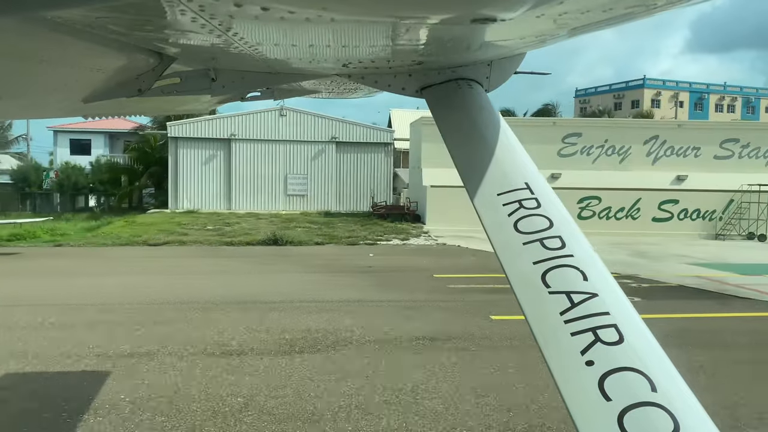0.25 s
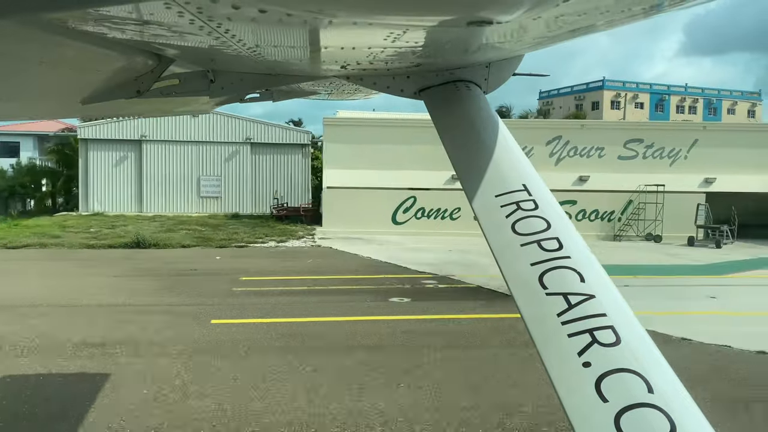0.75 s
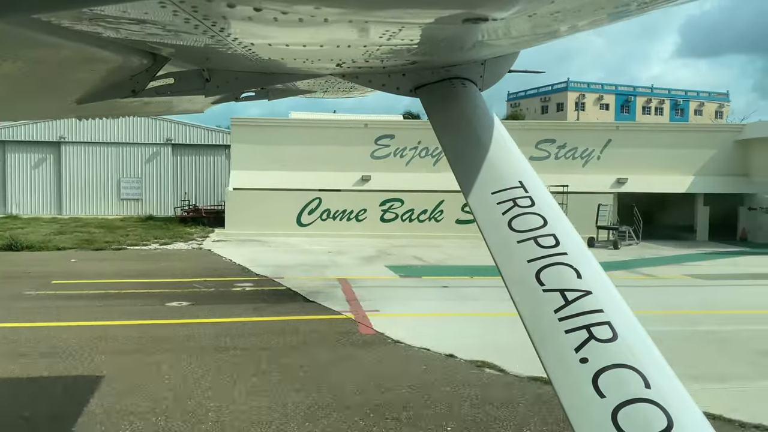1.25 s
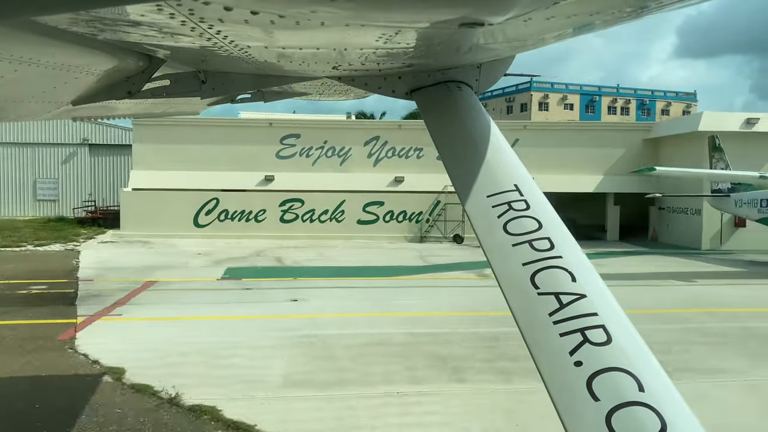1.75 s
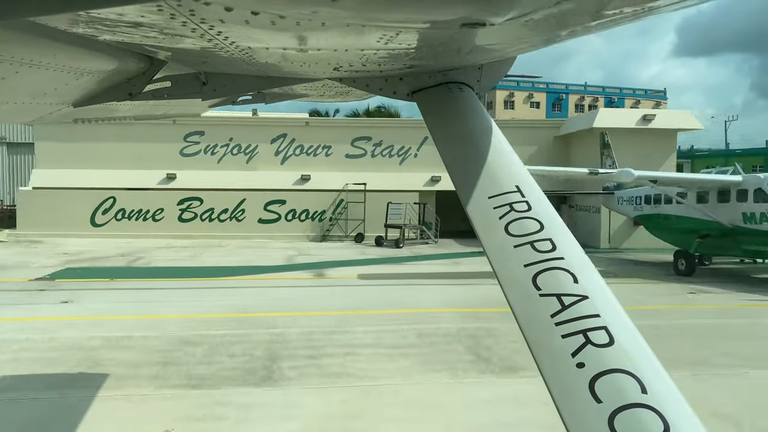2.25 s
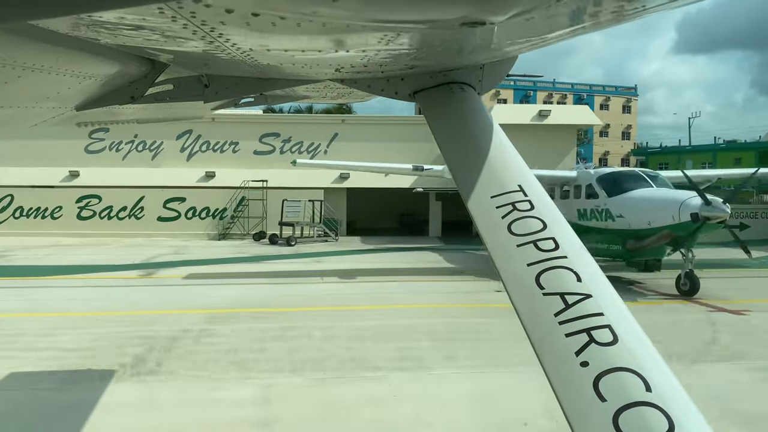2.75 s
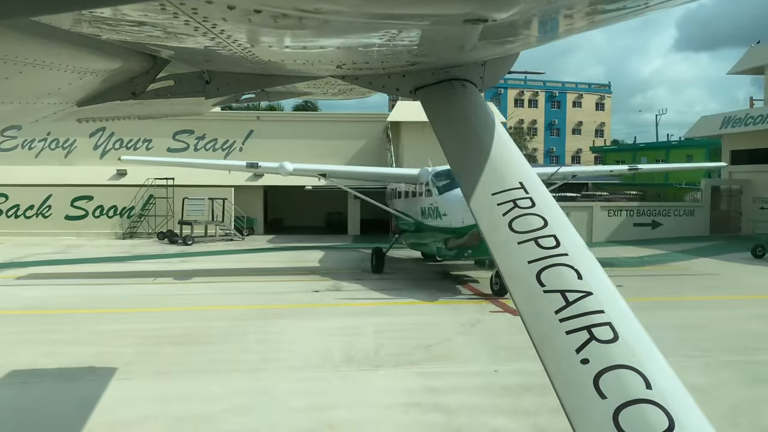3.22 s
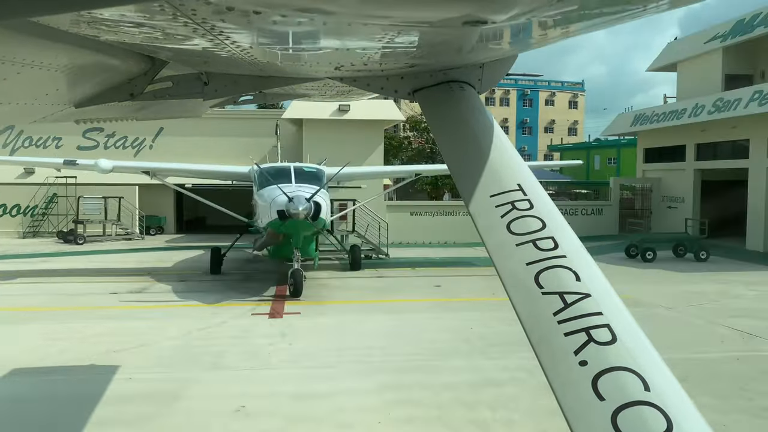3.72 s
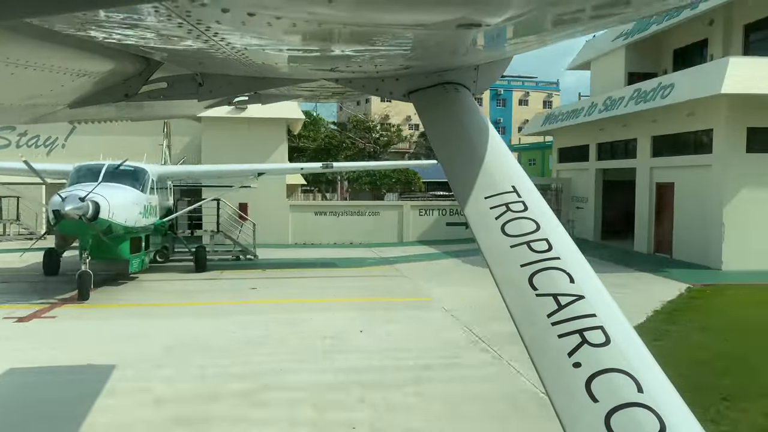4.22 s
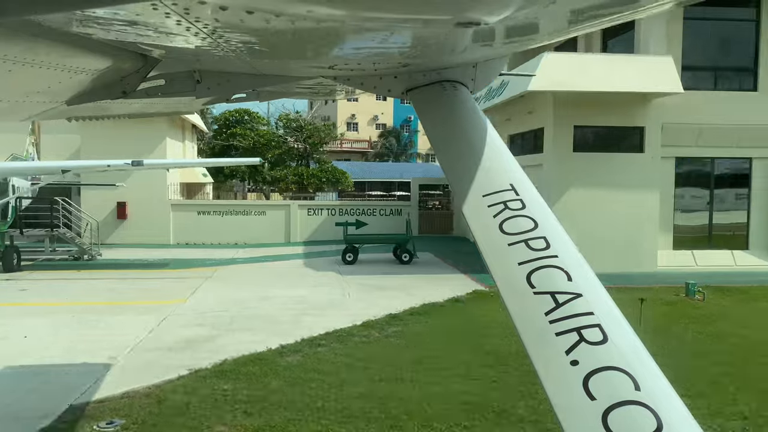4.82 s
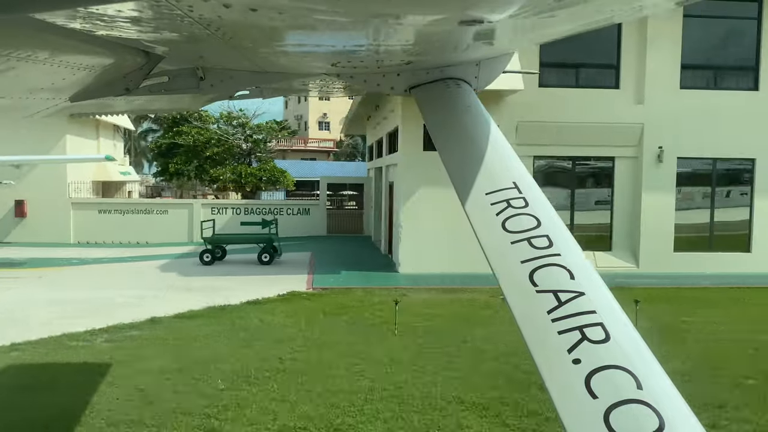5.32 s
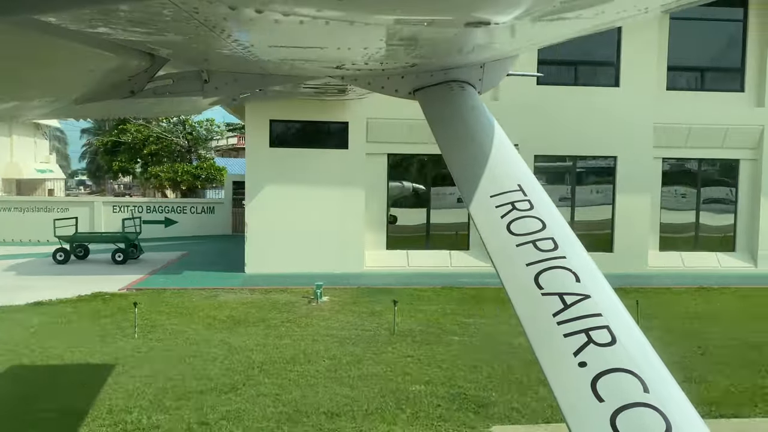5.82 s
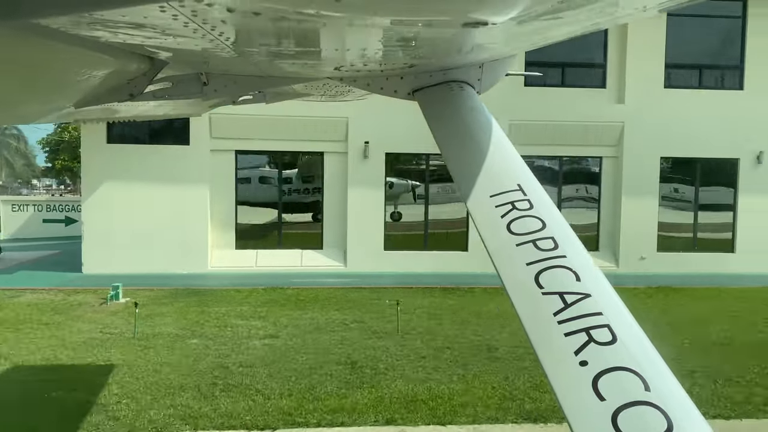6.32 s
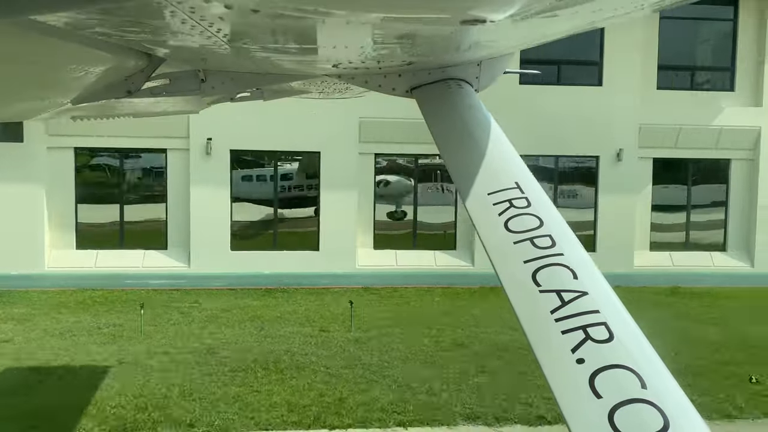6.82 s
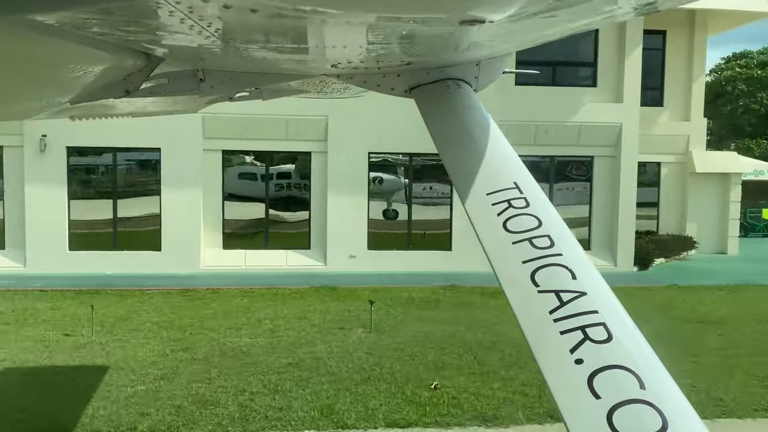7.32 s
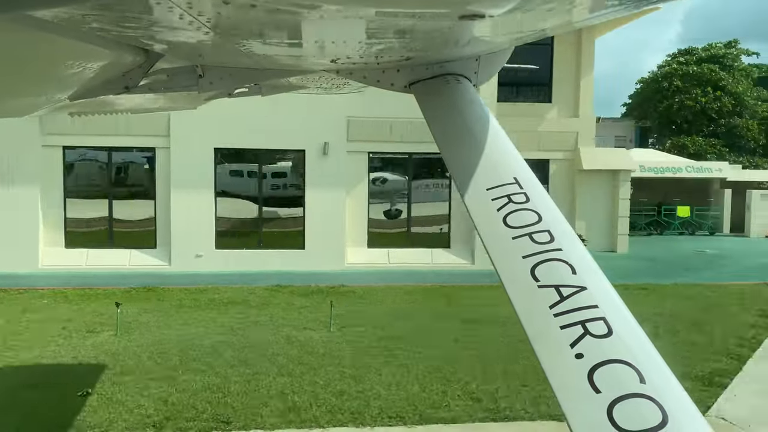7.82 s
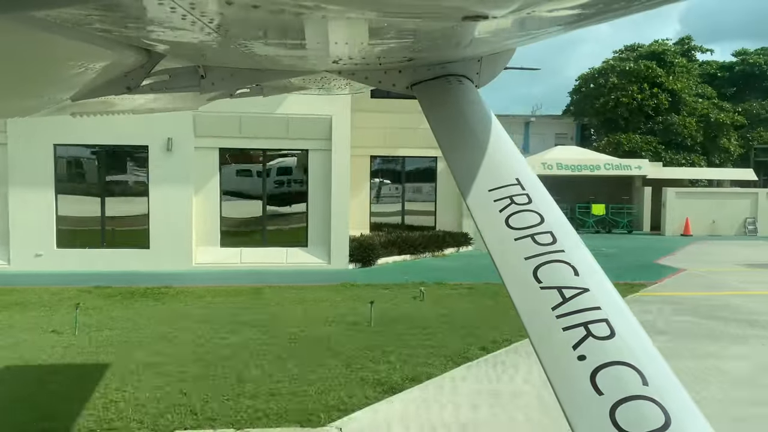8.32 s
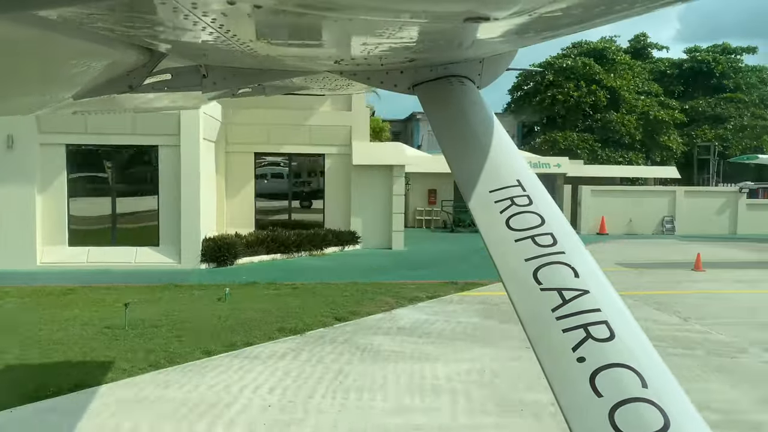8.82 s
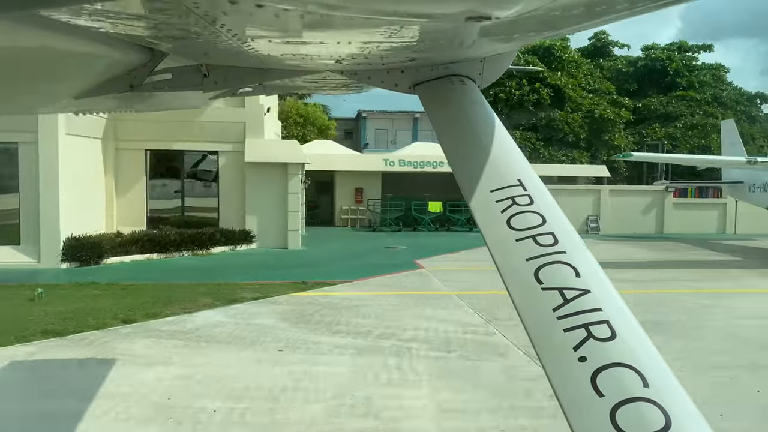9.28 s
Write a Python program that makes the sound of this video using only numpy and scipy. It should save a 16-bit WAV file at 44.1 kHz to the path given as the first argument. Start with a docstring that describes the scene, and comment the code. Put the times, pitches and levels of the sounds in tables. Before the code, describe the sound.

A passenger's-ear stereo view of a small propeller aircraft cabin rolling past airport buildings. The engine holds low power: heavy bass drone, gently swelling hums, grainy midrange roar, hiss lightly chopped by propeller blades, and a piercing but quiet compressor whine. A loud dry snap breaks in before the middle, followed by a small knock and a double metallic clink, then several faint clicks toward the end while the drone carries on.

```python
"""Turboprop cabin, taxiing

Inside the cabin of a small single-engine turboprop at low power, heard by two microphone ports a few
centimetres apart. Wavering sines are the thin tones of shafts, gears, fans and compressor; shaped noise
is the drumming hull, the exhaust roar and the intake hiss. Fittings snap as short filtered noise bursts,
and a metal buckle clinks as a short rattle of noise with one firm click, ringing its modes."""
import sys
import numpy as np
from scipy import signal
from scipy.fft import rfft, irfft, next_fast_len
from scipy.io import wavfile

SR = 44100
rng = np.random.default_rng(int(sys.argv[2]) if len(sys.argv) > 2 else 0)


def log_audio(samples):
    """Write samples as a 16-bit WAV file to the path given in sys.argv[1]."""
    # one column per channel
    frames = np.atleast_2d(samples).T
    # limit to full scale, then quantise
    limited = np.clip(frames, -1, 1)
    pcm = np.round(limited * 32767).astype(np.int16)
    wavfile.write(sys.argv[1], SR, pcm)


N = 421155

# Engine tones at the starting speed, levels before swell and waver:
# (frequency [Hz], rms level [dB], left over right [dB], left lag [rad], waver spread [dB])
ENGINE_TONES = [(58.3, -25, .5, 0, 1.5), (64.7, -18.8, .5, 0, .8), (84, -24.5, .5, 0, 1.5),
                (88.3, -29.5, .5, 0, 3), (420, -35, 3, .3, 3), (670, -47, 2, 2.6, 3),
                (777.5, -42.5, -1, 2.4, 3), (899.5, -50, 2, 1.3, 3), (1161, -52, 0, 2.2, 3),
                (1556, -54.5, -2, -.4, 3), (2176, -63, -4, -1.1, 3), (2726, -65, 1, -1.7, 3),
                (4359, -63, -2, .2, 3), (5123, -67, 3, -.3, 3), (6215, -48.5, 5, -1.1, 2.5),
                (12430, -58, 0, 1.9, 4), (14105, -72, 0, -1.9, 3)]
# Swells of the hums at 58 and 84 Hz: (time [s], lower hum [dB], upper hum [dB])
HUM_SWELL = [(0, 6, -1), (.7, -4, -2), (2.2, -6, 2.5), (2.7, 2.5, 1), (4.7, 0, 3), (5.7, -3, -3),
             (7.7, 2.5, -4), (8.3, 5, -4), (9.55, 1, -1)]
# Swell of the compressor tone and its octave: (time [s], level [dB])
WHINE_SWELL = [(0, -4), (.6, 5), (1.2, -.5), (3.4, 0), (3.65, -5), (3.9, 0.5), (6.8, 1), (7.15, -5),
               (7.55, 5.5), (7.95, -3.5), (8.7, -1.5), (9.2, 4), (9.55, -2)]
# Thin accessory tone, nearer the right port, before drift: (time [s], frequency [Hz], rms level [dB])
PUMP_TONE = [(0, 1840, -68), (3.9, 1840, -64), (4.2, 1839, -53), (9.55, 1822, -51)]

# Spectrum of the hull drone: (frequency [Hz], relative density [dB])
DRONE_SPECTRUM = [(20, -56), (32, -62), (42, -39), (75, -36), (105, -37), (135, -40.5), (158, -42),
                  (205, -40), (250, -44), (330, -47), (400, -48), (480, -50.5), (570, -51.5), (680, -59)]
# Course of the hull drone: (time [s], level [dB], lift around 100-225 Hz [dB])
DRONE_COURSE = [(0, -15.5, 2.5), (.6, -16.5, 4.5), (2.35, -16, 3), (2.7, -15.5, 0), (4.4, -15, 0.5),
                (9.55, -14.5, -1)]
# Spectrum of the exhaust roar: (frequency [Hz], relative density [dB])
ROAR_SPECTRUM = [(680, -60), (900, -59.5), (1150, -62), (1400, -67), (1900, -72), (2400, -73),
                 (3300, -73.5), (5200, -79), (5900, -79), (6700, -77), (8000, -79), (8800, -80),
                 (10800, -85.5), (12200, -84.3), (13300, -84.5), (15900, -94)]
# Course of the exhaust roar before the blade chop: (time [s], rms level [dB])
ROAR_COURSE = [(0, -30.5), (3, -30.5), (3.8, -30), (6.8, -30), (7.7, -29), (8.3, -30.5), (9.55, -29.5)]
# Resonances of the intake hiss: (centre [Hz], width [Hz])
HISS_RESONANCES = [(7000, 1300), (8600, 600)]
# Course of the intake hiss before the blade chop: (time [s], lower band [dB], upper band [dB])
HISS_COURSE = [(0, -49, -55), (.6, -48, -49), (3.6, -51, -46.5), (5.6, -49, -51), (7.6, -43, -54),
               (9.55, -43, -56)]
# Resonances of cabin and ducts: (centre [Hz], width [Hz], lift [dB])
CABIN_RESONANCES = [(61, 10, 2.5), (74, 9, -3), (158, 8, -2), (205, 30, 1), (240, 14, -2.5), (385, 36, 1),
                    (550, 57, 2), (710, 50, -2), (775, 45, 4.5), (825, 25, -2), (900, 50, 4), (1045, 40, 3),
                    (1085, 20, -1.5), (1160, 43, 5), (1310, 60, 2), (1430, 50, 3), (1495, 50, -4),
                    (1670, 120, 6), (1795, 40, -2.5), (1880, 50, -2), (2090, 100, 4), (2400, 120, 2.5),
                    (2730, 90, 3.5), (3170, 200, 2), (3640, 170, -4.5), (3740, 60, 4), (3880, 150, 2),
                    (6170, 160, 6.5), (6450, 90, 2.5), (6670, 130, 1.5), (12400, 250, 12)]
# Noise field at the two ports: (frequency [Hz], left over right [dB], likeness [0-1], left lag [rad])
PORT_FIELD = [(60, .6, .99, 0), (200, .8, .96, 0), (350, 3, .83, 0), (520, 7, .72, 1.2),
              (680, 2.7, .45, 2.6), (800, -.5, .8, 2.4), (950, 1.5, .35, 1.6), (1300, 0, .4, 2.6),
              (1700, 0, .35, 1), (2300, 1.2, .4, -1.8), (3200, 1.3, .62, -.4), (3700, 1.5, .12, 0),
              (5600, 1.2, .2, -.5), (6250, 4, .77, -.9), (7050, .6, .9, 0), (8000, .3, .7, 1.5),
              (8800, 0, .99, 2.75)]

# Snaps and taps of cabin fittings, peak before the balance between the ports:
# (time [s], peak [dB], low edge [Hz], high edge [Hz], body T60 [s], left over right [dB], bright edge [dB])
FITTING_SNAPS = [(3.906, -9.5, 750, 4600, .045, -2, -6), (3.909, -18.5, 1050, 1250, .12, -2, -40),
                 (4.012, -28, 1550, 1850, .12, 0, -40), (4.7905, -16.5, 1300, 2000, .025, -3, -22),
                 (7.176, -30, 3000, 9000, .04, 1, -20), (7.662, -27, 1300, 5000, .04, 0, -14),
                 (7.845, -22, 1250, 1800, .07, 0, -34), (7.975, -26, 5200, 5800, .04, 2, -34),
                 (7.981, -26, 3600, 4400, .06, 0, -34), (7.993, -28, 6300, 7000, .04, 0, -34)]
# Clinks of the buckle: (time [s], ring peak [dB], brightness [dB/octave], scratch gain beside ring [dB])
BUCKLE_CLINKS = [(4.952, -20.5, 0, -15), (5.035, -25, 2.5, -11)]
# Modes of the buckle, levels before brightness and chance: (frequency [Hz], level [dB], T60 [s])
BUCKLE_MODES = [(3176, -3, .06), (3900, -12, .02), (4540, -12, .02), (5350, -5, .015), (5850, -1, .025),
                (6340, -2, .02), (6800, -9, .015), (10780, -9, .01), (14130, -13, .06), (14600, -12, .015)]

WHINE_HZ, SAG_HZ_PER_S = 6215, 1.1  # the compressor tone sinks, and all engine tones in proportion
CYCLES_PER_WAVER, FASTEST_WAVER_HZ = 114, 12  # higher tones waver faster, up to a limit
BLADES_HZ = 57.6  # propeller blades passing
TREBLE_LAG_S = .000244  # above the port table the phase lag grows as one arrival, later at the left port
EDGE_T60_S, EDGE_CUT_HZ = .035, 8000  # bright edge of a snap: decay time, low-pass
# Firm click in each snap and clink: delay, and amplitude beside the crackle's unit shared noise
CONTACT_S, SNAP_CONTACT_DB, BUCKLE_CONTACT_DB = .001, 19, 17
CUTOFF_HZ = 15700


def from_db(db):
    """Decibels to gain."""
    return 10 ** (np.asarray(db) / 20)


def in_time(rows):
    """Columns of a timed table as curves, sample by sample."""
    time_s, *columns = np.transpose(rows)
    return [np.interp(np.arange(N) / SR, time_s, column) for column in columns]


def drift(corner_hz):
    """Slow chance of spread 1: noise twice through a one-pole low-pass, at every 40th sample."""
    r = np.exp(-80 * np.pi * corner_hz / SR)
    noise = rng.standard_normal(N // 40 + 2002)
    slow = signal.lfilter([1], [1, -2 * r, r * r], noise)[2000:]  # skip the filter's start
    return np.interp(np.arange(N) / 40, np.arange(len(slow)), slow / slow.std())


def peak(hz, centre_hz, width_hz):
    """Bell of a resonance, 1 on top and one half at the edges of its width."""
    return 1 / (1 + (2 * (hz - centre_hz) / width_hz) ** 2)


def spectrum(points):
    """Gain against frequency from a table, next to silent outside it."""
    at_hz, db = np.transpose(points)
    return lambda hz: from_db(np.interp(np.log(hz), np.log(at_hz), db, left=-200, right=-200))


def bandpass(low_hz, high_hz, order, sound):
    """Butterworth band-pass."""
    sos = signal.butter(order, [low_hz, high_hz], "band", fs=SR, output="sos")
    return signal.sosfilt(sos, sound)


def noise_field(shape, count, patchy_db, flicker_hz):
    """Noise of a given spectrum at both ports, in overlapping bands that swell partly alone; rms 1."""
    size = next_fast_len(N)
    hz = np.maximum(np.arange(size // 2 + 1) * SR / size, 1)

    # What the two ports share, and how far one lags
    port_hz, *columns = np.transpose(PORT_FIELD)
    balance_db, alike, lag = [np.interp(hz, port_hz, column) for column in columns]
    alike = np.clip(alike, 0, 1)
    lag = lag + 2 * np.pi * TREBLE_LAG_S * np.maximum(hz - port_hz[-1], 0)
    shared, own = rfft(rng.standard_normal((2, size)))
    right = alike * np.exp(1j * lag) * shared + np.sqrt(1 - alike ** 2) * own

    # Source spectrum coloured by the cabin
    lift_db = sum(db * peak(hz, centre, width) for centre, width, db in CABIN_RESONANCES)
    gain = shape(hz) * from_db(lift_db)
    both = gain * np.array([shared * from_db(balance_db / 2), right * from_db(-balance_db / 2)])

    # Bands evenly spaced in log frequency over the audible range
    heard = hz[gain > gain.max() / 300]
    place = np.log(hz / heard[0]) / np.log(heard[-1] / heard[0])
    place = np.clip(place, 0, 1) * (count - 1)
    together, out = drift(flicker_hz), 0
    for k in range(count):
        weight = np.clip(1 - abs(place - k), 0, 1)
        band = irfft(both * weight, size)[:, :N]
        out = out + band * from_db(patchy_db * (0.2 * together + drift(flicker_hz)))
    return out / np.sqrt(np.mean(out ** 2))


def engine_tones():
    """Shafts, gears, fans and compressor blades: sines that follow engine speed and waver in level."""
    speed = 1 - SAG_HZ_PER_S / WHINE_HZ * np.arange(N) / SR
    turned_s = np.cumsum(speed * (1 + 0.00047 * drift(6.2))) / SR  # time stretched by the speed
    whine_db, = in_time(WHINE_SWELL)
    low_hum_db, high_hum_db = in_time(HUM_SWELL)
    swell_db = {ENGINE_TONES[0][0]: low_hum_db, ENGINE_TONES[2][0]: high_hum_db,
                WHINE_HZ: whine_db, 2 * WHINE_HZ: whine_db}
    out = 0
    for hz, db, balance_db, lag, waver_db in ENGINE_TONES:
        level_db = db + swell_db.get(hz, 0)
        angle = 2 * np.pi * (hz * turned_s + rng.random())
        pair = from_db([[balance_db / 2], [-balance_db / 2]]) * np.sin([angle, angle + lag])
        waver = drift(min(hz / CYCLES_PER_WAVER, FASTEST_WAVER_HZ))
        out = out + np.sqrt(2) * from_db(level_db + waver_db * waver) * pair
    return out


def pump():
    """Accessory tone, nearer the right port: a sine whose pitch and level drift slightly."""
    hz, db = in_time(PUMP_TONE)
    angle = 2 * np.pi * np.cumsum(hz * (1 + 0.000516 * drift(0.99))) / SR
    pair = from_db([[-3.5], [3.5]]) * np.sin([angle, angle + 2.1])
    return np.sqrt(2) * from_db(db + 2.0 * drift(2.9)) * pair


def blade_chop():
    """Passing blades as a swing between -1 and 1 at the blade rate, with a wandering phase."""
    return np.cos(2 * np.pi * BLADES_HZ * np.arange(N) / SR + 2.2 * drift(2.6))


def hull_drone():
    """Exhaust and propeller wash drumming on the hull: low noise with a changing lift in the bass."""
    level_db, boom_db = in_time(DRONE_COURSE)
    drone = noise_field(spectrum(DRONE_SPECTRUM), count=5, patchy_db=0.0, flicker_hz=2.2)
    drone = from_db(level_db) * drone
    return drone + (from_db(boom_db) - 1) * bandpass(100, 225, 1, drone)


def exhaust_roar(chop):
    """Bright exhaust noise, patchy in level and chopped a little by the blades."""
    level_db, = in_time(ROAR_COURSE)
    roar = noise_field(spectrum(ROAR_SPECTRUM), count=7, patchy_db=1.13, flicker_hz=16.4)
    return from_db(level_db + .5 * chop) * roar


def intake_hiss(chop):
    """Compressor intake noise in two resonant bands, chopped by the blades."""
    out = 0
    for level_db, (centre_hz, width_hz) in zip(in_time(HISS_COURSE), HISS_RESONANCES):
        hiss = noise_field(lambda hz: peak(hz, centre_hz, width_hz),
                           count=2, patchy_db=1.0, flicker_hz=9.0)
        out = out + from_db(level_db + 1.6 * chop) * hiss
    return out


def snaps():
    """Cabin fittings: noise crackles a few ms and dies, a band-passed body with a brighter edge."""
    out, age = np.zeros((2, N)), np.arange(SR // 8) / SR
    dull = signal.butter(1, EDGE_CUT_HZ, fs=SR, output="sos")
    after = np.maximum(age - .004, 0)  # decay starts after 4 ms
    for time_s, db, low_hz, high_hz, t60, balance_db, edge_db in FITTING_SNAPS:
        # one noise common to both ports, one of each port's own
        noise = rng.standard_normal(len(age)) + 1.4 * rng.standard_normal((2, len(age)))
        crackle = noise * np.minimum(age / .001, 1)
        crackle[:, round(CONTACT_S * SR)] = from_db(SNAP_CONTACT_DB)
        body = bandpass(low_hz, high_hz, 2, crackle * from_db(-60 * after / t60))
        edge = from_db(edge_db - 60 * after / EDGE_T60_S) * signal.sosfilt(dull, crackle)
        snap = body + edge
        level = from_db([[db + balance_db / 2], [db - balance_db / 2]])
        at = round(time_s * SR)
        out[:, at:at + len(age)] += snap / abs(snap).max() * level
    return out


def clinks():
    """Metal buckle: a short rattle of noise, heard bare, and with a firm click ringing decaying modes."""
    out, age = np.zeros((2, N)), np.arange(SR // 4) / SR
    high = signal.butter(1, 2500, "high", fs=SR, output="sos")
    for time_s, db, bright_db, scratch_db in BUCKLE_CLINKS:
        noise = rng.standard_normal(len(age)) + .7 * rng.standard_normal((2, len(age)))
        rattle = noise * from_db(-60 * age / .11) * np.minimum(age / .004, 1)
        modes = 0
        for hz, level_db, t60 in BUCKLE_MODES:
            mode_db = level_db + bright_db * np.log2(hz / 6000) + rng.normal(0, 2.5)
            modes = modes + from_db(mode_db - 60 * age / t60) * np.sin(2 * np.pi * hz * age)
        scratch = signal.sosfilt(high, rattle)
        rattle[:, round(CONTACT_S * SR)] = from_db(BUCKLE_CONTACT_DB)  # heard in the ring only
        ring = signal.fftconvolve(rattle, modes[None], axes=1)[:, :len(age)]
        clink = ring / abs(ring).max() + from_db(scratch_db) * scratch
        at = round(time_s * SR)
        out[:, at:at + len(age)] += from_db(db) * clink
    return out


def scene():
    """Everything that reaches the two ports."""
    steady = engine_tones() + pump()
    chop = blade_chop()
    airflow = hull_drone() + exhaust_roar(chop) + intake_hiss(chop)
    return steady + airflow + snaps() + clinks()


def record(dry):
    """Microphone chain: peaks are rounded, then a steep low-pass cuts the top."""
    rounded = 1.6 * np.tanh(dry / 1.6)
    return signal.sosfilt(signal.ellip(10, .3, 70, CUTOFF_HZ, fs=SR, output="sos"), rounded)


dry = scene()
out = record(dry)
log_audio(out)
```